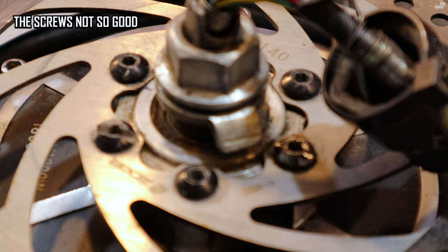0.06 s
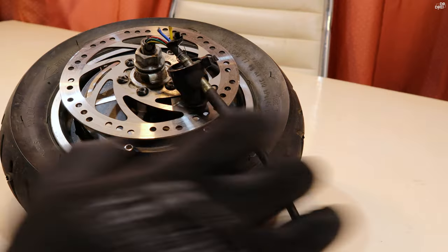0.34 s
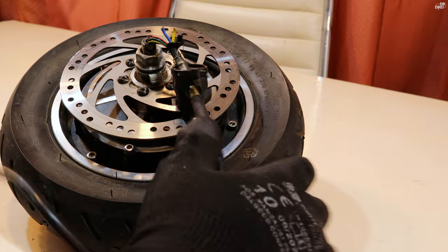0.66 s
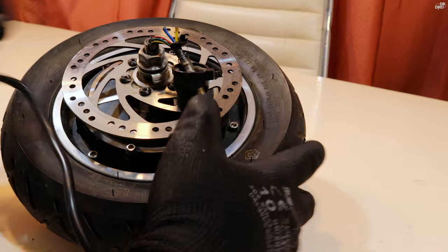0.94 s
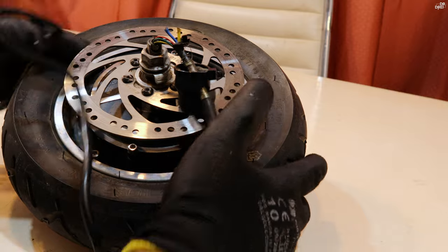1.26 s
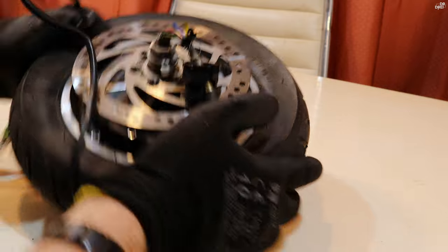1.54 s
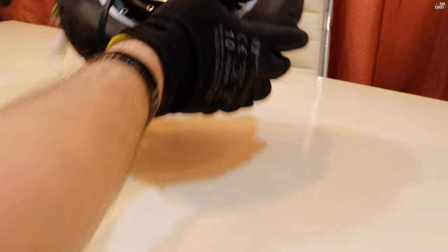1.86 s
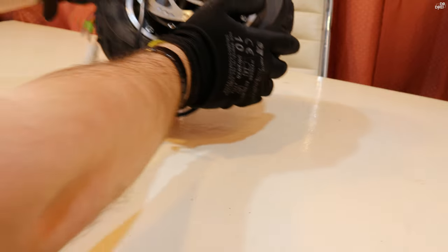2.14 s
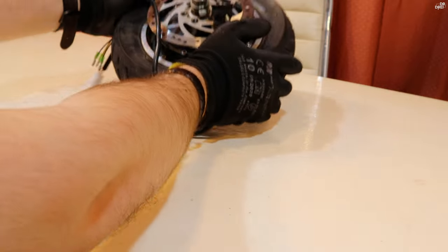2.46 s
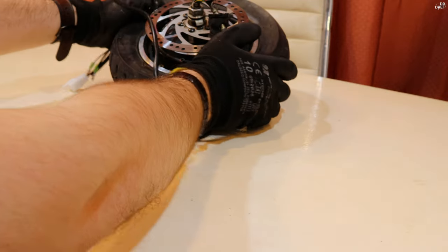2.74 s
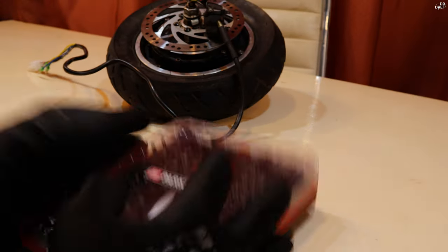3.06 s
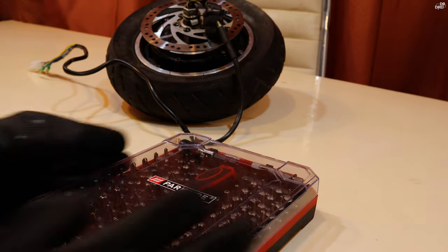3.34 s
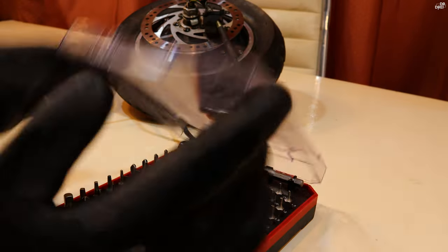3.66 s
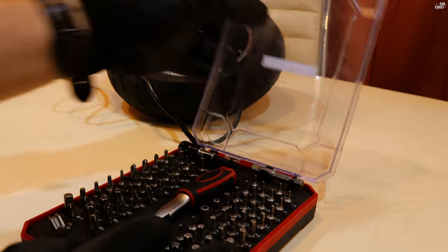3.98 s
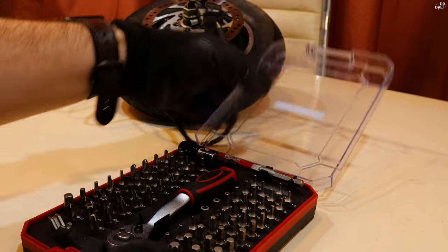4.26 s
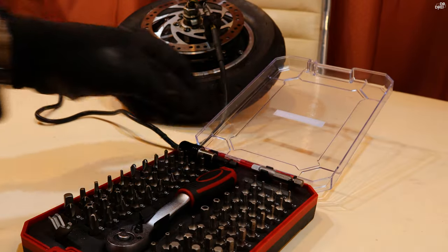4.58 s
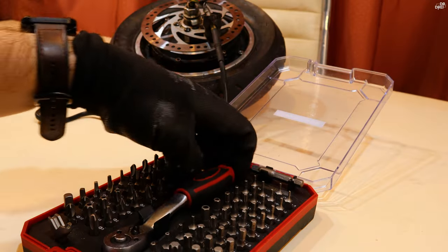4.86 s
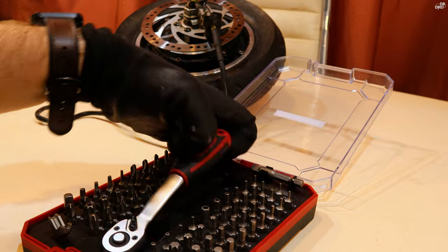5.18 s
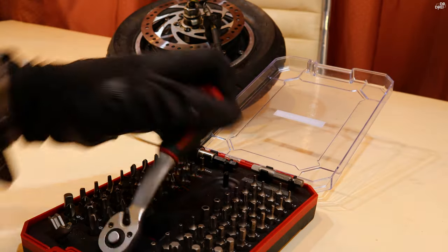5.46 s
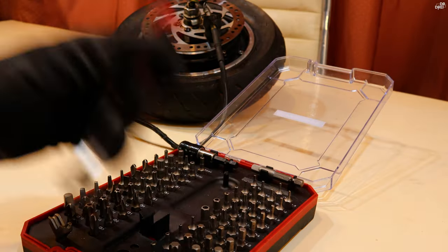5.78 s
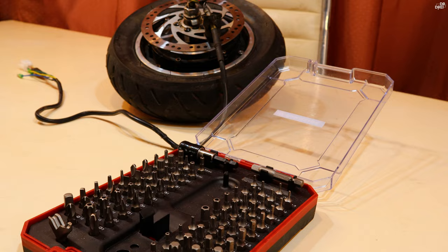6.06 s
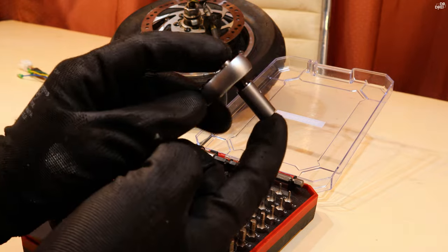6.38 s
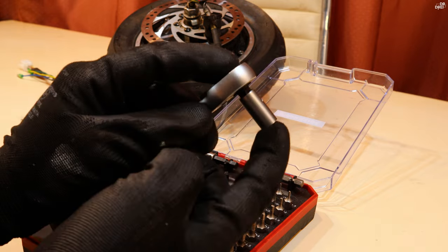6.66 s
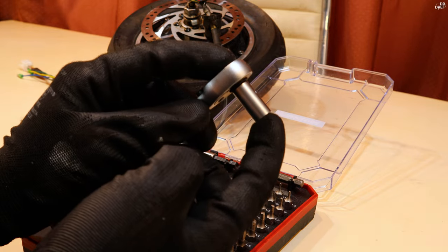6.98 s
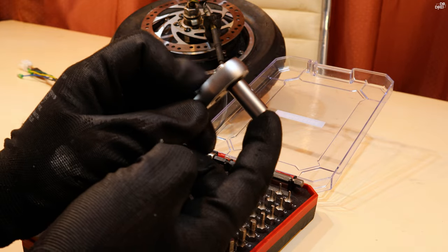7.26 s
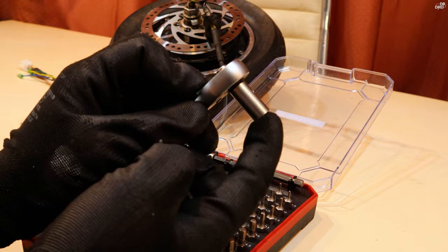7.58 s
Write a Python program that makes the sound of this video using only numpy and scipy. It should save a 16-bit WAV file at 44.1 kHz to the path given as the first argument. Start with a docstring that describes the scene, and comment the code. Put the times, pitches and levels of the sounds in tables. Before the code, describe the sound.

Close to a stereo microphone in a small room, metal chinks and dull knocks come from a heavy wheel being handled. It thuds onto a table, followed by a louder bang and rattle from a plastic bit case. Gloves swish softly, the lid clacks open and bounces, and a tool is pulled free with small snaps. Two crisp ratchet clicks finish. A faint, distant engine hums under the first half.

```python
"""Motor wheel and tool case on a table

Close to a stereo microphone in a small room, gloved hands shift a scooter's heavy motor wheel: it knocks,
its brake disc chinks, and the table top booms as it is set down. A plastic case of bits lands, its lid
falls open, and a ratchet is pulled out and clicks twice. The walls answer every blow, and far off an
engine hums under the room's rumble and hiss."""
import sys
import numpy as np
from scipy import signal
from scipy.fft import rfft, irfft
from scipy.io import wavfile
from scipy.ndimage import uniform_filter1d

SR = 44100
rng = np.random.default_rng(int(sys.argv[2]) if len(sys.argv) > 2 else 0)


def materialize(psi):
    """Save the field psi as 16-bit PCM at rate SR to the path in sys.argv[1].

    A 1-D psi becomes a single channel; in a 2-D psi each row is a channel.
    """
    bounded = np.clip(np.atleast_2d(psi).T, -1, 1)
    quanta = np.round(bounded * 32767).astype(np.int16)
    wavfile.write(sys.argv[1], SR, quanta)


N = 336042
SIZE = 32768  # samples in one blow
AGE, FREQ, TIME = np.arange(SIZE) / SR, np.arange(SIZE // 2 + 1) * SR / SIZE, np.arange(N) / SR

# Spectra of the room noise, the gloves and each struck body. Each row: frequency in Hz, relative dB.
RUMBLE = [(12, -40), (20, -4.5), (129, -0.5), (230, -2), (270, -6.5), (353, -13.5), (520, -25.5),
          (880, -120)]
AIR = [(250, -14.5), (600, -13), (1760, -20.5), (4010, -28.5), (11600, -42.5), (15000, -51)]
GLOVE_COLOUR = [(150, -35), (700, 1.5), (1700, 1), (4500, -3.5), (12000, -15.5), (15000, -37)]
SCRAPE_BODY = [(150, -10), (400, -0.5), (800, 0), (1200, -3.5), (11000, -16), (15000, -38)]
SNAP_BODY = [(200, -29), (800, -8), (2000, 0), (6000, 1), (12700, -2), (16000, -24)]
LATCH_BODY = [(250, 6), (3600, -0.5), (8000, -10), (12500, -16.5), (15500, -50)]
CASE_BODY = [(30, -113), (120, -3.5), (400, -3), (900, -3.5), (8000, -13.5), (12500, -15), (15000, -43)]
LID_BODY = [(100, -34), (280, -1.5), (450, -7.5), (650, 2), (1200, -0.5), (1800, -3.5), (3000, -7),
            (5500, -8.5), (8000, -13), (12500, -30), (15000, -56)]
DISC_BODY = [(180, -45), (300, -6.5), (1010, -2.5), (2570, -3), (3080, -5.5), (4160, -3), (6200, 2),
             (8500, -11.5), (11700, -8.5), (16000, -30)]
WHEEL_BODY = [(120, -4), (350, 0), (900, 6.5), (1800, -1.5), (4400, -13), (11000, -41), (15000, -65)]
LANDING_BODY = [(60, 1), (300, 14), (1500, 2.5), (3000, -8.5), (5000, -21), (11000, -43), (15000, -55)]
# Resonances of each object. Each row: frequency in Hz, relative gain in dB, seconds to fall 60 dB.
SCRAPE_MODES = [(770, 5.5, 0.025), (1850, 8, 0.0057)]
STEEL_MODES = [(4140, 18.7, 0.026), (6050, 13, 0.014), (7260, 15, 0.024), (11070, 18.3, 0.0035),
               (12200, 8, 0.003)]
LATCH_MODES = [(870, 20, 0.035), (1600, 25, 0.0089), (2380, 15, 0.0088), (3680, 5, 0.067)]
CASE_MODES = [(325, 8.8, 0.11), (553, 24, 0.12), (750, 18.6, 0.0087), (884, 4.3, 0.13)]
LID_MODES = [(314, 23.5, 0.38), (686, 12.5, 0.11), (904, 12, 0.12), (1116, 11, 0.073)]
DISC_MODES = [(4040, 19, 0.035), (4324, 33.5, 0.03), (4440, 30.5, 0.038), (6500, 4, 0.01),
              (8400, 21, 0.012), (10700, 9, 0.01)]
WHEEL_MODES = [(386, 20.5, 0.058), (593, 13.5, 0.15), (829, 13, 0.38), (1460, 7, 0.08), (1750, 10, 0.067)]
TABLE_MODES = [(56.2, -10.5, 0.41), (108.9, -6.5, 1), (130, 6, 0.52), (164.3, -13.5, 0.43), (234, 4.5, 0.1),
               (280.8, 3.5, 0.32), (353, 0.5, 0.36), (536, 2, 0.1)]
# Stereo width of sound from all around. Each row: frequency in Hz, side minus mid in dB.
WIDTH = [(60, -23), (200, -10), (500, 1), (2380, 5), (15000, 9)]
# Speed of the far engine. Each row: time in seconds, cycle rate in Hz.
ENGINE_SPEED = [(0.0, 22.81), (1.11, 22.61), (2.6, 25.43)]
# Its harmonics. Each row: multiple of the cycle rate, relative level in dB.
ENGINE_ORDERS = [(2, -10.5), (5, -3.5), (6, -2.5), (9, -10.5)]
# Glove moves. Each row: middle in seconds, level in dB, half length in seconds, tilt in dB per octave.
SWISHES = [(0.568, -61, 0.25, 0.5), (1.662, -49, 0.1, -1.5), (2.097, -61.5, 0.19, 1.5),
           (2.773, -51, 0.15, 2.5), (3.075, -43, 0.04, -10.5), (3.599, -53, 0.14, 1.5),
           (3.734, -51, 0.076, 1), (3.99, -55.5, 0.18, 0.5), (4.527, -51, 0.59, 1), (5.371, -55.5, 0.5, 1),
           (5.766, -53.5, 0.1, 0), (5.958, -55.5, 0.12, 0.5), (6.23, -58, 0.15, 0.5)]
# Disc and hinge squeaks. Each row: start in seconds, level in dB, length in seconds, first and last Hz.
SQUEAKS = [(0.706, -48, 0.026, 2660, 2900), (1.259, -40.5, 0.031, 2870, 3100),
           (1.415, -42, 0.027, 8450, 8260), (1.56, -36.5, 0.014, 1716, 2080),
           (3.743, -39.5, 0.024, 830, 733), (4.035, -49.5, 0.054, 2470, 2480),
           (4.055, -44.5, 0.026, 770, 730), (4.225, -47, 0.023, 773, 670)]
# Jolts of the bits, clacks in the case, and tyre and case landing on the table.
# Each row: start in seconds, level in dB, tilt in dB per octave.
JOLTS = [(3.24, -26, -5.5), (4.52, -34, -2)]
CASE_CLACKS = [(3.641, -38.5, -4), (3.744, -34.5, -1.5), (4.001, -36, -3.5), (4.454, -31, -4),
               (5.540, -38, -4), (5.657, -28.5, -3.5)]
LANDINGS = [(2.611, -29, 3), (2.671, -29, -3), (2.721, -11, -2), (3.186, -24.5, 4), (3.197, -17.5, -4.5),
            (3.211, -6.5, 2), (3.220, -7.5, 3), (3.240, -15, -15)]
# Brief, hard contacts. Each row: start in seconds, level in dB, tilt in dB per octave, ring in dB.
SNAPS = [(2.7215, -31, 1, -20), (3.2195, -18, -8, -13), (3.2405, -38, -4, -20), (3.346, -42, 5, -18),
         (3.903, -29, 8.5, -31), (4.4945, -18.5, -0.5, -20), (6.740, -40.5, -6.5, -26)]
LATCHES = [(2.9345, -19.5, 2.5, 11), (2.960, -25, -1, -2), (2.969, -18, 3, -15), (5.232, -30, 0, -16),
           (5.654, -22.5, 4.5, -9)]
DISC_TICKS = [(0.707, -43, 12, -4), (0.716, -41.5, 3, -29), (0.8955, -18.5, -0.5, -41),
              (1.009, -15, 0.5, -30), (1.263, -34, -2.5, -36), (1.336, -27, -5.5, -22)]
DISC_CHINKS = [(1.389, -32.5, 4, 3), (1.409, -22.5, -1, -7), (1.4515, -12.5, 0.5, 0.5), (1.464, -32, -5, 4)]
# Chattering contacts.
# Each row: start in seconds, level in dB, tilt in dB per octave, chatter in ms, ring in dB.
SCRAPES = [(2.939, -30.5, -1, 32, -10), (3.405, -36.5, -4.5, 38, -10), (3.49, -45.5, 3.5, 62, 11),
           (5.178, -31.5, 0, 51, 0), (5.214, -36, 1.5, 58, 5)]
LID_CLACKS = [(4.478, -26.5, 2.5, 18, -10), (4.5, -14.5, -2, 4.4, -17), (4.5033, -7, 1, 6.4, -8),
              (4.509, -18.5, 2, 9.7, 6), (4.5195, -21.5, 0, 5, -2), (4.53, -24.5, 1.5, 21, 1),
              (4.556, -24.5, -0.5, 26, -13)]
WHEEL_KNOCKS = [(1.077, -28.5, 8, 30, -10), (1.087, -24.5, -5, 15, 4), (1.123, -25, 6, 13, -2),
                (1.169, -26.5, 0.5, 22, -9), (1.317, -30.5, 2.5, 28, -3), (1.334, -25, 1.5, 22, 4),
                (1.389, -26, -1, 32, 3.5), (1.420, -25.5, -13.5, 13, 15), (1.4525, -12, 3, 12.3, -15),
                (1.462, -15.5, 3, 11, 2.5), (2.519, -33.5, 2, 37, -9)]
# Pawl strikes. Each row: the same five columns, then the pawl's note in Hz.
RATCHET_CLICKS = [(7.0169, -11, 1.5, 4.2, -3.5, 2040), (7.354, -21, 2, 3, -13, 2900),
                  (7.356, -21.5, -2.5, 2.8, -1, 2900)]
# Weight pushing on the table top. Each row: start in seconds, relative level in dB, push in ms.
THUMPS = [(2.613, -15.5, 1.9), (2.67, -13, 4.2), (2.723, 5, 2.04), (3.185, -3, 1.43), (3.237, -4.5, 3.3),
          (3.316, -8.5, 3.8), (4.456, -19, 1.4), (5.194, -16, 5.2), (5.668, -12.5, 5.3)]
# Moments when the ringing stops short. Each entry: time in seconds.
STOPS = [2.85, 3.652, 4.732, 6.25, 9]
LULL_S = (3.66, 4.72)  # the bass drops away between these times


def undb(db):
    """Decibels to gain."""
    return 10 ** (np.asarray(db) / 20)


def colour(points, f):
    """Gain of a spectrum table at the frequencies f."""
    hz, db = np.transpose(points)
    return undb(np.interp(np.log(f + 1), np.log(hz), db))


def tilted(points, tilt_db):
    """A spectrum table brightened by tilt_db per octave."""
    return [(hz, db + tilt_db * np.log2(hz)) for hz, db in points]


def causal(gain):
    """The response with this gain that dies away fastest after a blow."""
    cepstrum = irfft(np.log(gain + 1e-9))
    cepstrum[1:SIZE // 2] *= 2
    cepstrum[SIZE // 2 + 1:] = 0
    return np.exp(rfft(cepstrum))


def walk(rate_hz, size=N):
    """A random wander with a spread near 1."""
    step = int(SR / rate_hz)
    return uniform_filter1d(np.repeat(rng.standard_normal(size // step + 1), step), step)[:size]


def envelope(span, attack_s, release_s):
    """Rise, hold and fall between two times."""
    start, end = span
    return np.clip(np.minimum((TIME - start) / attack_s, (end - TIME) / release_s), 0, 1)


def add(out, s, sound, fade_samples=256):
    """Mix a sound in at time s; if it rings as far as the next stop, it fades at once."""
    start = int(s * SR)
    stop = min(N, start + SIZE, int(SR * min(t for t in STOPS if t > s)))
    remaining = np.arange(stop - start, 0, -1)
    out[:, start:stop] += sound[:, :stop - start] * np.minimum(remaining / fade_samples, 1)


def diffuse(points, size, wide_db=0):
    """Coloured noise from all around the microphone: narrow in the bass, wide above it."""
    f = np.arange(size // 2 + 1) * SR / size
    mid, side = rfft(rng.standard_normal((2, size))) * colour(points, f)
    mid, side = irfft(mid, size), irfft(side * colour(WIDTH, f) * undb(wide_db), size)
    return np.array([mid + side, mid - side]) / mid.std()


def room_tone(rumble_db=-48, air_db=-55.5, dip_db=-19.5, recovery_db_per_s=12):
    """Steady hiss over a swelling rumble, which drops in the lull and creeps back."""
    lull_db = envelope(LULL_S, 0.013, 0.017) * (dip_db + recovery_db_per_s * (TIME - LULL_S[0]))
    rumble = diffuse(RUMBLE, N) * undb(rumble_db + lull_db + 2 * walk(5.1))
    return rumble + diffuse(AIR, N) * undb(air_db)


def far_engine(waver_db=2, rise_db_per_s=1.5):
    """A distant engine hums in harmonics of its cycle, gathers speed, draws nearer and fades."""
    turns = np.cumsum(np.interp(TIME, *np.transpose(ENGINE_SPEED))) / SR
    hum = sum(undb(db + waver_db * walk(2.58)) * np.sin(2 * np.pi * (order * turns + rng.random()))
              for order, db in ENGINE_ORDERS)
    return hum * envelope((0, 3.32), 0.6, 0.6) * undb(-44 + rise_db_per_s * TIME)


def drone(hz=191, db=-43, waver_db=2):
    """A low tone lingers after the case lands."""
    level = envelope((3.28, 3.66), 0.045, 0.0093) * undb(db + waver_db * walk(57))
    return level * np.sin(2 * np.pi * hz * TIME)


def room(low_t60=0.34, high_t60=0.19, split_hz=4000, onset_s=0.0016):
    """Frequency response of the small room's reflections; the treble dies first."""
    low = diffuse([(split_hz / 2, 0), (split_hz * 2, -20)], SIZE, wide_db=-5.5)
    high = diffuse([(split_hz / 2, -20), (split_hz, 0)], SIZE, wide_db=3)
    tail = low * undb(-60 * AGE / low_t60) + 1.84 * high * undb(-60 * AGE / high_t60)
    tail *= np.clip(AGE / onset_s - 1, 0, 1)
    return rfft(tail / np.sqrt(np.sum(tail ** 2) / 2))


def gloves(patchy_db=3, grain_db=3, crinkle_db=8, split_hz=4000):
    """Cloth swishes; low drag and high rustle catch in their own patches and crinkle as threads slip."""
    swishes, out = np.zeros((2, 2, N))
    for s, db, half_s, tilt_db in SWISHES:
        stop = min(t for t in STOPS if t > s)
        now = np.flatnonzero((np.abs(TIME - s) < half_s) & (TIME < stop))
        cloth = diffuse(tilted(GLOVE_COLOUR, tilt_db), 2 * SIZE, wide_db=-3)
        swell = np.cos(np.pi / 2 * (TIME[now] - s) / half_s) ** 2
        swishes[:, now] += cloth[:, :len(now)] * undb(db) * swell
    drag = signal.sosfiltfilt(signal.butter(2, split_hz, fs=SR, output="sos"), swishes)
    for band in (drag, swishes - drag):
        patches = undb(patchy_db * walk(30) + grain_db * walk(400))
        crinkles = undb(crinkle_db) * np.maximum(walk(830) - 1.4, 0)
        out += band * patches * (1 + crinkles)
    return out


def singing_disc(hz=4400, skirt_hz=1200, db=-49.5, rough_db=5):
    """Uneven rubbing keeps the brake disc's high mode singing as the wheel is lifted."""
    rub = envelope((1.565, 1.715), 0.11, 0.033) * undb(db + rough_db * walk(90))
    return diffuse([(hz - skirt_hz, -45), (hz, 0), (hz + skirt_hz, -45)], N) * rub


def squeaks(walls, wander=0.048, rough_db=5, room_db=-7):
    """A slipping contact sings for a moment; its pitch slides and trembles."""
    out = np.zeros((2, N))
    for s, db, length_s, start_hz, end_hz in SQUEAKS:
        progress = np.minimum(AGE / length_s, 1)
        hz = (start_hz + (end_hz - start_hz) * progress) * (1 + wander * walk(1300, SIZE))
        level = np.sin(np.pi * progress) * undb(db + rough_db * walk(340, SIZE))
        tone = level * np.sin(2 * np.pi * np.cumsum(hz) / SR)
        add(out, s, irfft(rfft(tone) * (1 + undb(room_db) * walls)))
    return out


def loose_bits(t60=0.57, grain_db=3):
    """After a jolt the bits rattle in their sockets and come to rest."""
    out = np.zeros((2, N))
    for s, db, tilt_db in JOLTS:
        rattle = diffuse(tilted(CASE_BODY, tilt_db), SIZE, wide_db=-15)
        add(out, s, rattle * undb(db - 60 * AGE / t60))
    return out * undb(grain_db * walk(300))


def contact_force(chatter_ms, crack, grain_db, seat_ms=1.204, scrape_ms=38):
    """Force spectra (shared, left, right): a crack as the parts seat, then a grainy, dying chatter."""
    age_ms = 1000 * AGE
    contacts = rng.standard_normal((3, SIZE)) * rng.exponential(1, SIZE)
    contacts *= undb(grain_db * walk(900, SIZE))
    # a long chatter is a scrape: it builds slowly and hardly cracks
    softness = (1 + (chatter_ms / scrape_ms) ** 2) ** 2
    contacts *= np.minimum(age_ms / (seat_ms * softness), 1) * np.exp(-2 * age_ms / max(chatter_ms, 1))
    contacts /= np.linalg.norm(contacts, axis=1, keepdims=True)
    contacts[0, np.searchsorted(age_ms, seat_ms)] += crack / softness
    # the force is even across pitch, so the colour is the object's own
    return np.array([f / causal(np.sqrt(uniform_filter1d(np.abs(f) ** 2, 300))) for f in rfft(contacts)])


def ringing(modes, ring_db):
    """Resonances of an object; the grip of the hand shifts them a little from blow to blow."""
    grip = 1 + 0.008 * rng.uniform(-1, 1, len(modes))
    return sum(undb(db + ring_db) / (1 + 1j * (FREQ - hz * shift) * 2 * np.pi * t60 / np.log(1000))
               for (hz, db, t60), shift in zip(modes, grip))


def blows(events, body, modes, walls, room_db, lag_ms, pan_db, scatter, crack, grain_db):
    """Each blow rings an object's body and modes, and reaches the microphone directly and off the walls."""
    out = np.zeros((2, N))
    # the left side hears it first; a positive pan leans left
    delay = np.exp(-2j * np.pi * FREQ * np.array([[0], [lag_ms / 1000]]))
    pan = undb(np.array([[pan_db], [-pan_db]]) / 2)
    for s, db, tilt_db, chatter_ms, ring_db in events:
        force = contact_force(chatter_ms, crack, grain_db)
        # treble radiates differently towards each side
        direct = force[0] * delay * pan + scatter * force[1:] * FREQ / (FREQ + 700)
        reflected = undb(room_db) * force[0] * walls
        tilt = undb(tilt_db * np.log2(FREQ / 1000 + 0.5))
        response = causal(colour(body, FREQ) * tilt) * (2 + ringing(modes, ring_db))
        sound = irfft(response * (direct + reflected))
        peak_power = uniform_filter1d(np.mean(sound ** 2, axis=0), 256).max()
        add(out, s, sound * undb(db) / np.sqrt(peak_power))
    return out


def touches(events, chatter_ms):
    """Small hard parts all chatter equally briefly."""
    return [(s, db, tilt_db, chatter_ms, ring_db) for s, db, tilt_db, ring_db in events]


def scrapes(walls):
    """Parts stick and slip against each other."""
    return blows(SCRAPES, SCRAPE_BODY, SCRAPE_MODES, walls,
                 room_db=-12.5, lag_ms=0.046, pan_db=0.3, scatter=0.62, crack=0.42, grain_db=-1)


def snaps(walls):
    """Wheel, bits, hinge and lid click sharply on contact."""
    return blows(touches(SNAPS, chatter_ms=6.5), SNAP_BODY, STEEL_MODES, walls,
                 room_db=-6, lag_ms=0.03, pan_db=1.5, scatter=0.85, crack=0.41, grain_db=12)


def latches(walls):
    """Plastic clips snap as the case is gripped and the ratchet comes out."""
    return blows(touches(LATCHES, chatter_ms=3.5), LATCH_BODY, LATCH_MODES, walls,
                 room_db=-4, lag_ms=0.066, pan_db=-1, scatter=0.75, crack=0.31, grain_db=6)


def case(walls, chatter_ms=16.7, ring_db=-9.5):
    """Lid, bits and ratchet clack softly in the plastic case."""
    return blows([(*clack, chatter_ms, ring_db) for clack in CASE_CLACKS], CASE_BODY, CASE_MODES, walls,
                 room_db=-2.5, lag_ms=0.043, pan_db=1, scatter=0.53, crack=0.46, grain_db=2)


def lid(walls):
    """The hollow lid falls open, hits the table and bounces."""
    return blows(LID_CLACKS, LID_BODY, LID_MODES, walls,
                 room_db=-2.5, lag_ms=0.074, pan_db=-2, scatter=0.58, crack=0.69, grain_db=4.5)


def ratchet(walls, pawl_db=15.5, pawl_t60=0.0041):
    """The pawl drops over a tooth: the steel head rings and the pawl adds a short note as it seats."""
    return sum(blows([click], SNAP_BODY, STEEL_MODES + [(pawl_hz, pawl_db, pawl_t60)], walls,
                     room_db=-2.5, lag_ms=0.058, pan_db=-0.5, scatter=1, crack=0.79, grain_db=11)
               for *click, pawl_hz in RATCHET_CLICKS)


def brake_disc(walls):
    """Left of the microphone, loose metal parts tick on the disc and its rim chinks as the wheel tips."""
    ticks = blows(touches(DISC_TICKS, chatter_ms=3.6), DISC_BODY, DISC_MODES, walls,
                  room_db=6, lag_ms=0.069, pan_db=7.5, scatter=1, crack=0.38, grain_db=9)
    chinks = blows(touches(DISC_CHINKS, chatter_ms=1.5), DISC_BODY, DISC_MODES, walls,
                   room_db=5, lag_ms=0.12, pan_db=8.5, scatter=0.47, crack=0.49, grain_db=8)
    return ticks + chinks


def wheel(walls):
    """Close up, the heavy wheel knocks as it is gripped and tipped."""
    return blows(WHEEL_KNOCKS, WHEEL_BODY, WHEEL_MODES, walls,
                 room_db=-1.5, lag_ms=0.13, pan_db=2.5, scatter=0.84, crack=0.45, grain_db=8)


def table_top(walls, room_db=-9, lowest_hz=36, rock_s=0.041, rock_db=-6, rock_stretch=1.415):
    """A half-sine push rings the table top; a longer push leaves only its lowest modes."""
    out = np.zeros((2, N))
    top = rfft(sum(undb(db - 60 * AGE / t60) * np.sin(2 * np.pi * hz * AGE)
                   for hz, db, t60 in TABLE_MODES))
    top *= causal(FREQ ** 3 / (FREQ ** 3 + lowest_hz ** 3) + 1e-3)  # very slow motion hardly radiates
    for s, db, push_ms in THUMPS:
        for rock in range(3):  # the weight rocks back, weaker and softer each time
            push = np.sin(np.pi * np.minimum(1000 * AGE / (push_ms * rock_stretch ** rock), 1))
            motion = top * rfft(push)
            thump = irfft(motion * (1 + undb(room_db) * walls)) / np.abs(irfft(motion)).max()
            add(out, s + rock * rock_s, thump * undb(db + rock * rock_db))
    return 0.42 * out


def landings(walls, chatter_ms=19, ring_db=-14.5, firm_db=-10.5, firm_ms=8.1):
    """Tyre and case land: a gentle knock chatters; a firm one strikes short, rebounds and chatters."""
    knocks = []
    for s, db, tilt_db in LANDINGS:
        if db > firm_db:
            knocks.append((s, db, tilt_db, firm_ms, ring_db))
            s, db = s + 0.009, db - 10  # the rebound
        knocks.append((s, db, tilt_db, chatter_ms, ring_db))
    return blows(knocks, LANDING_BODY, CASE_MODES, walls,
                 room_db=1.5, lag_ms=0.06, pan_db=-1, scatter=0.98, crack=1, grain_db=2.5)


def scene():
    """Wheel, case and ratchet on one table near the microphone, with the room behind them."""
    walls = room()
    sources = (brake_disc, wheel, landings, latches, lid, case, scrapes, snaps, ratchet, squeaks)
    handling = sum(source(walls) for source in sources)
    close = handling + loose_bits() + table_top(walls) + gloves() + singing_disc()
    return close + room_tone() + far_engine() + drone()


def record(dry, gap_s=(0.372, 0.405), bass_hz=90.5, top_hz=16200):
    """The sound drops out briefly, the bass thins in the lull, the loudest peaks clip, the top is cut."""
    gate = 1 - 0.97 * uniform_filter1d(1.0 * ((TIME > gap_s[0]) & (TIME < gap_s[1])), 64)
    thin = signal.sosfilt(signal.butter(2, bass_hz, "highpass", fs=SR, output="sos"), dry)
    sound = dry + envelope(LULL_S, 0.02, 0.02) * (thin - dry)
    clipped = np.clip(sound * gate, -1, 1)
    return signal.sosfilt(signal.ellip(8, 0.2, 70, top_hz, fs=SR, output="sos"), clipped)


dry = scene()
out = record(dry)
materialize(out)
```